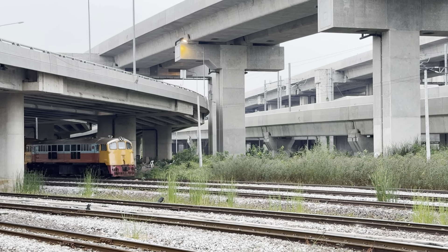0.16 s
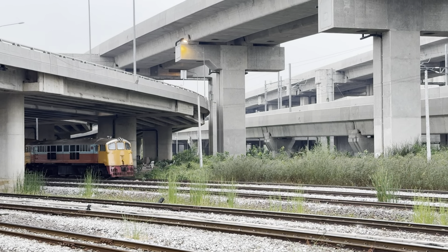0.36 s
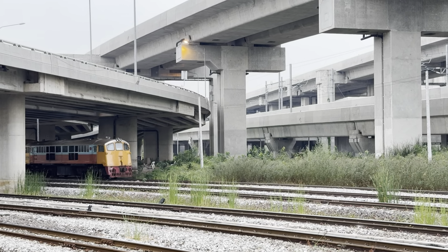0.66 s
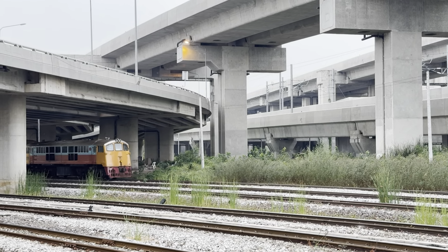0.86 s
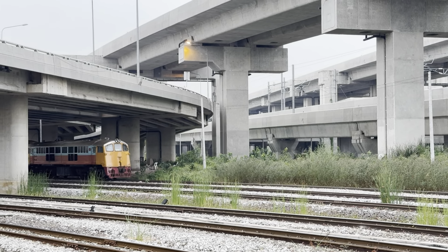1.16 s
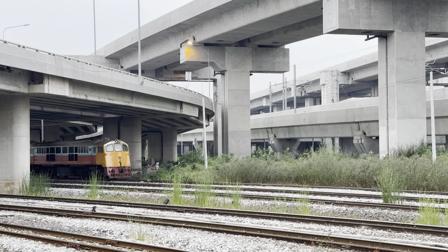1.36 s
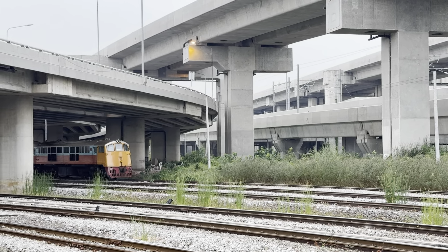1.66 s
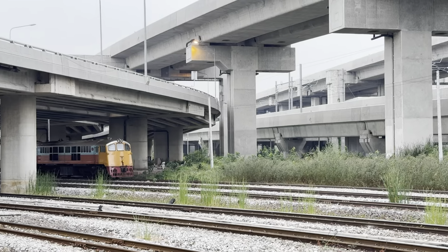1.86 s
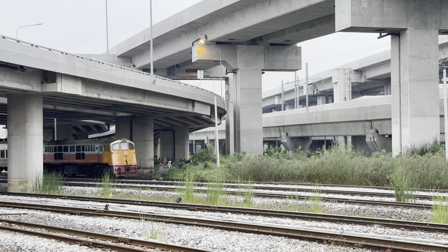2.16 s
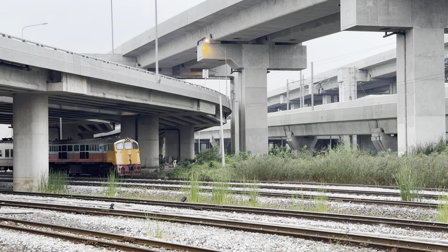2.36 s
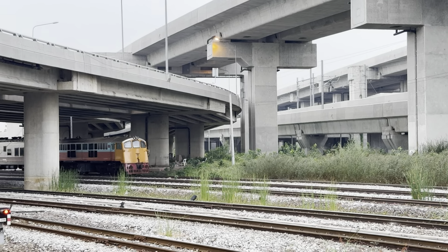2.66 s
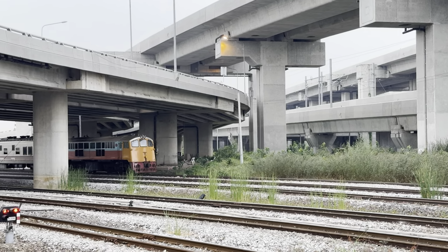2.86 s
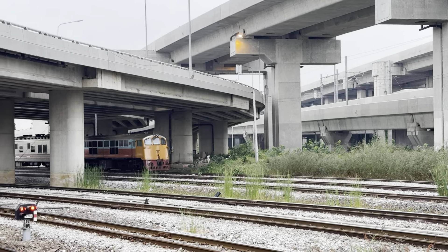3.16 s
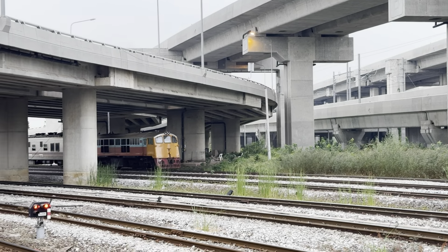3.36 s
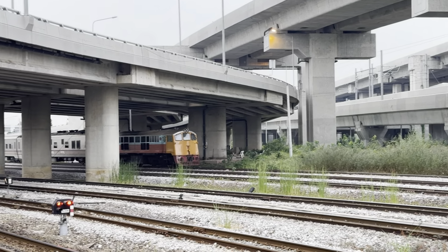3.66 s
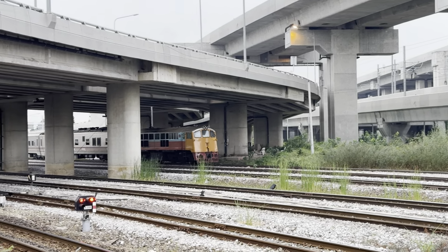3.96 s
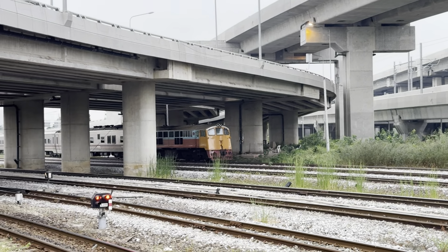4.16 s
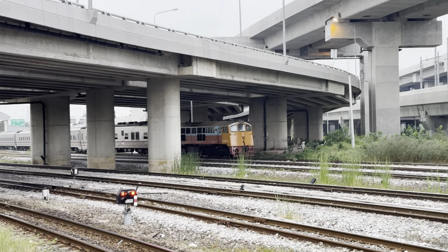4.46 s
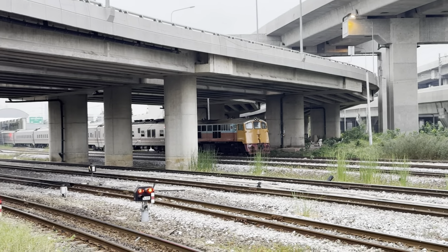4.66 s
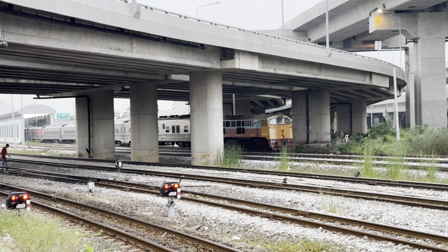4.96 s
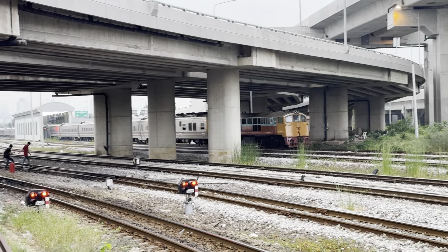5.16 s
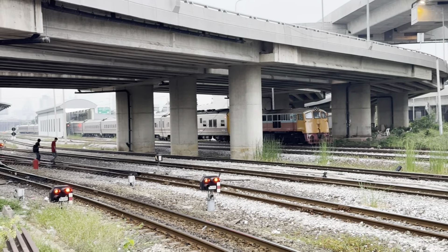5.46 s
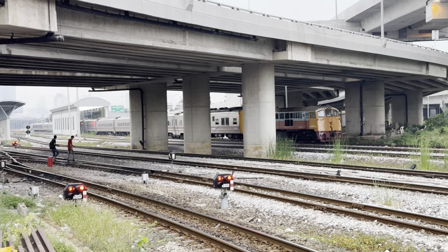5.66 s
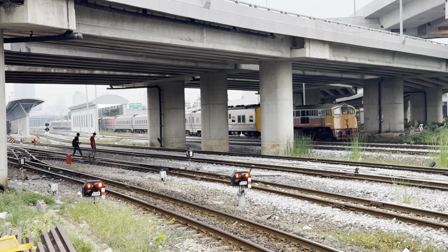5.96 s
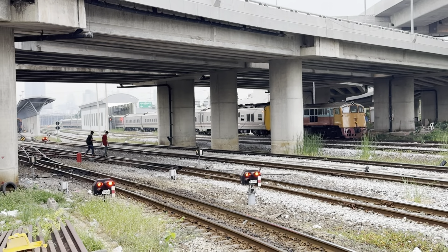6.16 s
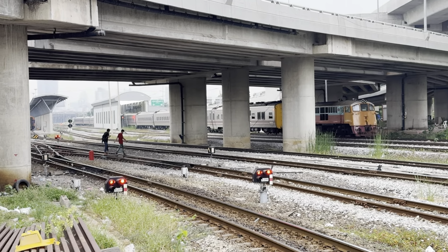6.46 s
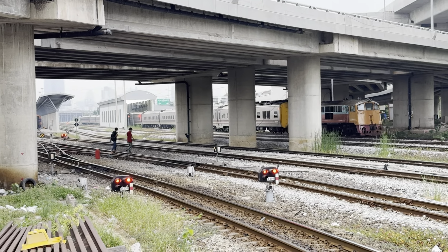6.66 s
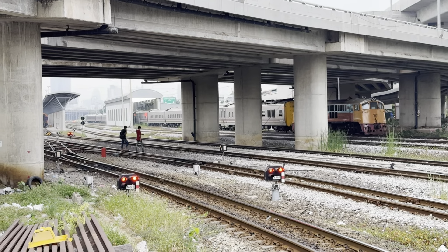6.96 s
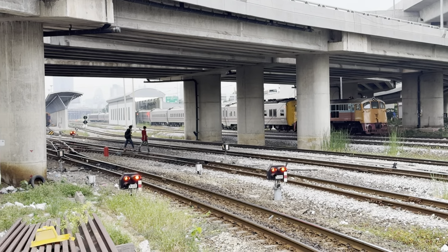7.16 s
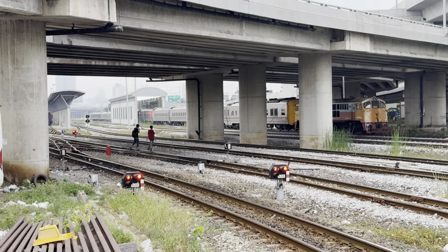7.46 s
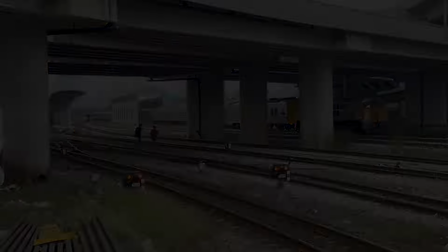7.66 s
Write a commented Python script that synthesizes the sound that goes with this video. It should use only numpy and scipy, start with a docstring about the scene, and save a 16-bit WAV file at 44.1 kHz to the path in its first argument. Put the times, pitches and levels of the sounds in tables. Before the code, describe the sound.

Deep, uneven diesel rumble in a rail yard, with a rasping rush easing down, early high metallic wheel squeals, faint ticks and far bird chirps.

```python
"""A diesel locomotive runs under concrete viaducts in a rail yard, some way off.
Its exhaust throbs as beating tones over a broad machinery roar made of noise bands and resonances.
A rasping whoosh of chopped, narrow noise climbs, then sinks as the load eases.
A wheel squeals in ringing tones for the first three seconds; later a thin whine of narrow noise rises.
A few far birds chirp in short gliding tones, and faint irregular ticks rattle throughout."""
import sys
import numpy as np
from scipy import signal
from scipy.fft import rfft, irfft
from scipy.io import wavfile
from scipy.ndimage import uniform_filter1d

SR = 44100
rng = np.random.default_rng(int(sys.argv[2]) if len(sys.argv) > 2 else 0)


def waveform_to_disk(signal):
    """Save audio, clipped to [-1, 1], as 16-bit WAV at the path in sys.argv[1]."""
    frames = np.transpose(np.atleast_2d(signal))
    scaled = np.clip(frames, -1, 1) * 32767
    samples = np.round(scaled).astype(np.int16)
    wavfile.write(sys.argv[1], SR, samples)


N = 343539


def from_db(db):
    """Turn decibels into gain."""
    return np.exp(np.asarray(db) * (np.log(10) / 20))


def rms_one(x):
    """Scale a sound to an average power of 1."""
    return x / np.sqrt(np.mean(x ** 2) + 1e-20)


def in_time(rows):
    """Draw lines between the rows, giving each column after the first a value at every sample."""
    seconds, *columns = np.transpose(rows)
    return [np.interp(np.arange(N) / SR, seconds, column) for column in columns]


def at_hz(points, hz):
    """Read a spectrum between its points, with pitch on a logarithmic scale."""
    point_hz, value = np.transpose(points)
    return np.interp(np.log(hz), np.log(point_hz), value)


def turn(hz):
    """Add up a frequency over time into a running phase in radians."""
    return 2 * np.pi * np.cumsum(hz * np.ones(N)) / SR


def drift(rate):
    """Wander smoothly at random with spread 1, changing about rate times a second."""
    # Smooth noise is made at a twentieth of the sample rate, then joined by straight lines.
    pole = np.exp(-40 * np.pi * rate / SR)
    white = rng.standard_normal(N // 20 + 4002)
    slow = signal.lfilter([1], [1, -2 * pole, pole * pole], white)
    slow = rms_one(slow[4000:])  # skip the filter's start
    steps = np.diff(slow)[:, None] * (np.arange(20) / 20)
    return (slow[:-1, None] + steps).ravel()[:N]


def narrow_noise(hz, width_hz):
    """Stir a resonance at random: a tone whose strength and phase wander, with rms 1."""
    turns = turn(hz) / (2 * np.pi)
    phase = (2 * np.pi * (turns - np.floor(turns))).astype(np.float32)
    return drift(width_hz * .75) * np.cos(phase) + drift(width_hz * .75) * np.sin(phase)


def spread(mid, side, hz):
    """Let two microphones hear a pitch more or less alike, by adding side with opposite signs."""
    # How far the two ears differ. Each row: pitch in Hz, side level in dB against the middle.
    width_points = [(60, -32), (125, -18.5), (250, -16), (400, -16), (570, -5.5), (720, -10), (900, -10),
                    (1140, -3), (1440, -16), (1810, -72), (2300, -70), (3300, -47), (5500, -50),
                    (7500, -55), (13000, -30)]
    return mid + from_db(at_hz(width_points, hz)) * side * np.array([[1], [-1]])


def banded_noise(spectrum, flicker_db, flicker_rate):
    """Add up third-octave bands of stereo noise, each flickering by itself; the sum has rms 1."""
    out, edges = 0, 20 * 2 ** (np.arange(30) / 3)
    white = rng.standard_normal((2, 2, N))
    for k, (low, high) in enumerate(zip(edges, edges[1:])):
        hz = np.sqrt(low * high)
        if spectrum[0][0] <= hz <= spectrum[-1][0]:
            band = signal.butter(3, [low, high], "band", fs=SR, output="sos")
            mid, side = signal.sosfilt(band, white[k % 2])  # neighbouring bands use separate noise
            level_db = at_hz(spectrum, hz) + flicker_db * drift(flicker_rate)
            out = out + from_db(level_db) * spread(mid, side, hz)
    return rms_one(out)


def smooth_noise(spectrum):
    """Shape random noise into an even, featureless sound of a given colour, with rms 1."""
    hz = np.maximum(np.arange(N // 2 + 1) * SR / N, 1)
    white = rng.standard_normal(N)
    return rms_one(irfft(rfft(white) * from_db(at_hz(spectrum, hz)), N))


def steadied(x, seconds):
    """Even out the slow swells of a sound, keeping its quick beating."""
    power = np.mean(x ** 2, axis=0)
    return x / np.sqrt(uniform_filter1d(power, int(seconds * SR)) + 1e-12)


def resonances(modes):
    """Add up randomly stirred resonances, in stereo."""
    out = 0
    for hz, width_hz, db in modes:
        mid, side = narrow_noise(hz, width_hz), narrow_noise(hz, width_hz)
        out = out + from_db(db) * spread(mid, side, hz)
    return out


def echoed(hz, width_hz, side_db):
    """Blur a tone as echoes from the piers do, slightly differently at each microphone."""
    side = from_db(side_db) * narrow_noise(hz, width_hz)
    return narrow_noise(hz, width_hz) + side * np.array([[1], [-1]])


def under_load(full_db, follows):
    """Give the gain of a part of the machinery as the load eases; follows is its share of the easing."""
    # The machinery quietens. Each row: time in seconds, level in dB against full load.
    load_curve = [(0, 0), (2.2, -0.5), (3.2, -2.5), (5.5, -5), (7.79, -6)]
    return from_db(full_db + follows * in_time(load_curve)[0])


def birds(echo_db=-15, echo_s=.04, blur_db=-6):
    """Sing short gliding chirps, blurred and trailed by echoes off the concrete."""
    # Far birds. Each row: start in seconds, middle pitch in Hz, length in seconds,
    # glide in octaves, level in dB.
    chirps = [(0.185, 5420, .065, -0.023, -50), (4.12, 4970, 0.047, -0.048, -51),
              (5.29, 3900, .047, -0.043, -53), (5.308, 5160, 0.034, -.06, -57),
              (5.5, 6480, .086, -0.004, -62), (5.572, 5010, .04, -.06, -47),
              (6.42, 5170, .043, -0.069, -55), (6.471, 6560, .12, -.01, -60),
              (6.606, 3880, 0.027, -0.12, -44), (6.72, 4700, .04, .22, -54),
              (6.763, 3910, 0.038, -0.108, -45), (6.787, 4380, 0.032, .17, -51),
              (6.93, 3800, .035, -.12, -43), (7.091, 3800, 0.037, -.12, -50), (7.21, 6500, .13, -.01, -58),
              (7.555, 4700, .04, .13, -50)]
    out, age = np.zeros(N + SR), np.arange(SR // 2) / SR
    scatter = drift(170) + 1j * drift(170)
    for start, hz, length, glide, db in chirps:
        at = int(np.clip(start * SR, 0, N - 1)) + np.arange(len(age))
        along = np.clip(age / length, 0, 1)
        gliding_hz = hz * 2 ** (glide * (along - .5))
        tone = np.exp(2j * np.pi * np.cumsum(gliding_hz) / SR)
        note = np.sin(np.pi * along) * (1 + from_db(blur_db) * scatter[at % N])
        fade = np.exp(-np.maximum(age - length, 0) / echo_s)
        echo = along * fade * scatter[at % N]
        out[at] += from_db(db) * np.real(tone * (note + from_db(echo_db) * echo))
    return out[:N]


def whine():
    """Whistle faintly and unsteadily, climbing slowly, as a narrow band of noise."""
    # Thin whine. Each row: time in seconds, pitch in Hz, level in dB.
    whine_curve = [(2.9, 6780, -85), (3.4, 7020, -88), (4.5, 7260, -76), (5.8, 7516, -66), (6.8, 7810, -73),
                   (7.79, 7850, -65)]
    hz, db = in_time(whine_curve)
    return from_db(db) * narrow_noise(hz, width_hz=38)


def singing_mode(mode, hz, murmur_db, echo_db, width_hz):
    """Murmur unevenly under the contact; at each catch lock into a tone that rises, holds and rings out."""
    # The wheel catches and one mode sings out. Each row: start in seconds, length in seconds,
    # name of the mode, level in dB.
    catch_rows = [(0.563, 0.019, "low", -33.5), (0.666, 0.017, "low", -33.5), (0.81, 0.058, "low", -37),
                  (1.0, 0.032, "low", -46), (1.18, 0.045, "middle", -50), (1.42, .06, "low", -40),
                  (1.604, 0.26, "low", -39), (1.87, 0.094, "low", -30), (1.98, 0.28, "high", -55.5),
                  (2.004, 0.15, "low", -35.5), (2.133, 0.13, "low", -37.5), (2.14, 0.067, "middle", -51),
                  (2.23, 0.068, "high", -45), (2.256, 0.27, "middle", -49.5), (2.33, 0.12, "low", -39),
                  (2.37, 0.3, "high", -45.5), (2.483, 0.25, "low", -37), (2.55, 0.28, "middle", -51.5)]
    # How hard the wheel bears on the rail. Each row: time in seconds, level in dB against full contact.
    contact_curve = [(0, -9.5), (.45, 0.5), (2.8, -1), (3.05, -10), (3.45, -19), (3.8, -49), (4.2, -80)]
    attack_s, t60_s = .02, .16  # t60: time to fade by 60 dB
    side_db = -21
    flutter_db, flutters_per_s = 1.8, 34
    t, catches = np.arange(N) / SR, 0
    for start, length, which, db in catch_rows:
        if which == mode:
            rising = np.clip((t - start) / attack_s, 0, 1)
            dying_db = -60 * np.clip((t - start - length) / t60_s, 0, 3)
            catches = np.maximum(catches, rising * from_db(db + dying_db))
    blurred = echoed(hz, width_hz, side_db)
    pure = np.sqrt(2) * np.cos(turn(hz))
    tone = steadied(pure + from_db(echo_db) * blurred, seconds=0.04)
    murmur_gain = from_db(murmur_db + in_time(contact_curve)[0])
    murmur = murmur_gain * steadied(blurred, seconds=0.16)
    flutter = from_db(flutter_db * drift(flutters_per_s))
    return flutter * (catches * tone + murmur)


def wheel():
    """Let three modes of the wheel sing out while the rubbing flange stirs the others roughly."""
    # Pitches of the singing modes. Each row: time in seconds, low, middle and high pitch in Hz.
    squeal_pitches = [(0, 4702, 6645, 8560), (.9, 4699, 6650, 8560), (1.6, 4705, 6655, 8552),
                      (2.15, 4708, 6694, 8549), (3.4, 4710, 6702, 8549)]
    # Wheel modes stirred by the rubbing. Each row: pitch in Hz, width in Hz, level in dB before the rub.
    rubbed_modes = [(3950, 80, -4), (4033, 32, -1.5), (4463, 25, -7), (4915, 25, -8), (7175, 30, -13),
                    (7950, 160, -11), (8110, 80, -7), (9410, 60, -15), (12180, 60, -23)]
    # Flange rubbing on the rail. Each row: time in seconds, level in dB.
    rub_curve = [(0, -73), (1, -81), (1.12, -52.5), (1.6, -50), (1.85, -46.5), (2.15, -47.5), (2.55, -49),
                 (2.8, -60), (3.3, -87), (4, -93)]
    # A wheel mode that flares briefly. Each row: time in seconds, level in dB.
    flare_curve = [(1.0, -80), (1.68, -70), (1.78, -47), (1.93, -51), (2.1, -63), (2.4, -55), (2.7, -73),
                   (3.3, -100)]
    flare_hz = 5865
    low, middle, high = in_time(squeal_pitches)
    song = singing_mode("low", low, murmur_db=-45.0, echo_db=-26, width_hz=15.2)
    song += singing_mode("middle", middle, murmur_db=-58.5, echo_db=-17, width_hz=23)
    song += singing_mode("high", high, murmur_db=-61.5, echo_db=-28, width_hz=17)
    rough = 0
    for hz, width_hz, db in rubbed_modes:
        rough = rough + from_db(db + 1.8 * drift(9.1)) * narrow_noise(hz, width_hz)
    flare = from_db(in_time(flare_curve)[0]) * narrow_noise(flare_hz, width_hz=39)
    return song + from_db(in_time(rub_curve)[0]) * rough + flare


def rattle(per_s=90, spread_db=5.0, level_db=-59):
    """Tick faintly and irregularly: each tap strikes small loose parts, with its own strength for each mode."""
    # Modes of small loose parts. Each row: pitch in Hz, time to fade by 60 dB in seconds,
    # level in dB against the other modes.
    loose_parts = [(2700, .012, -26), (3700, 0.011, 11), (4290, 0.019, 3), (4980, 0.011, -3),
                   (6540, 0.0034, -18), (8200, 0.0067, -11), (12400, 0.0079, -9)]
    strength_db = spread_db * np.minimum(rng.exponential(1, N), 3)
    taps = (rng.random(N) < per_s / SR) * from_db(strength_db)
    out = 0
    for hz, t60, db in loose_parts:
        pole, w = from_db(-60 / (t60 * SR)), 2 * np.pi * hz / SR
        strikes = taps * rng.standard_normal(N) + 1e-18  # the tiny offset avoids vanishing numbers
        ring = signal.lfilter([0, np.sin(w)], [1, -2 * pole * np.cos(w), pole * pole], strikes)
        out = out + from_db(db) * ring
    return from_db(level_db) * rms_one(out)


def knocking(rough_db=2.0):
    """Puff strongly, then more weakly, in each turn; returns a gain of about unit power."""
    # How deeply the knocking chops the rush. Each row: time in seconds, depth from 0 to 1.
    knock_depth = [(0, 0.74), (1, 0.56), (1.7, 0.5), (2.4, 0.15), (7.79, 0)]
    knocks_per_s = 31.1
    second_puff, sharpness = .48, 2.4
    swing = sharpness * np.cos(turn(knocks_per_s) + drift(25) / 10)
    pair = np.exp(swing) + second_puff * np.exp(-swing)  # the second comes half a turn later
    puffs = rms_one(pair * from_db(rough_db * drift(21)))
    depth = np.clip(in_time(knock_depth)[0], 0, 1)
    return np.sqrt(1 - depth + depth * puffs ** 2)


def turbo(knock):
    """Rush air in a band that follows the load and stirs its casing, chopped by the knocking."""
    # Air rushing through the turbocharger. Each row: time in seconds, centre pitch in Hz, level in dB.
    whoosh_curve = [(0, 1707, -42), (.5, 1876, -40), (1.45, 1916, -38.5), (2.1, 2000, -36),
                    (2.55, 2067, -40), (3, 1966, -48.5), (3.8, 1805, -50), (4.8, 1717, -52.5),
                    (5.7, 1566, -48), (6.6, 1466, -48), (7.79, 1403, -49)]
    # Ring of the turbocharger casing. Each row: pitch in Hz, width in Hz, level in dB against the rush.
    casing_modes = [(2995, 93, -24)]
    hz, db = in_time(whoosh_curve)
    rush = steadied(narrow_noise(hz, width_hz=180)[None], seconds=0.056)
    return from_db(db) * (rush + resonances(casing_modes)) * knock


def clatter(knock):
    """Mix mechanical noise, lightly shaken by the knocking, with a fine hiss and bright resonances."""
    # Colour of the mechanical noise. Each row: pitch in Hz, relative level in dB per Hz.
    clatter_colour = [(300, 4), (560, -1.5), (720, 3), (900, 2), (1140, 0), (1440, -1.5), (1810, -5.5),
                      (2280, -7.5), (2870, -6.5), (3620, -32.5), (4560, -14), (5750, -19.5), (7240, -22),
                      (9120, -25), (10000, -40)]
    # Colour of the hiss. Each row: pitch in Hz, relative level in dB per Hz.
    hiss_colour = [(2000, -34), (3000, -15), (4560, 10.5), (5750, 0.5), (7240, -1.5), (8400, -6.5),
                   (9400, 4.5), (10500, 6), (11500, -1), (12400, -7.5), (13500, -5), (15000, -30)]
    # Airy hiss. Each row: time in seconds, level in dB.
    air_curve = [(0, -52), (1.1, -50), (2.5, -53), (3.5, -55), (4.3, -55.5), (5, -57), (6, -61),
                 (7.79, -59)]
    # Bright resonances of the machinery. Each row: pitch in Hz, width in Hz, level in dB.
    sizzle_modes = [(2519, 830, -51), (2890, 47, -59.5), (3614, 380, -50.5), (4470, 360, -68)]
    noise = banded_noise(clatter_colour, flicker_db=1.52, flicker_rate=23)
    shaken = under_load(full_db=-34.5, follows=1) * noise * knock ** 0.28
    hiss_db = in_time(air_curve)[0] + .5 * drift(30)
    hiss = from_db(hiss_db) * smooth_noise(hiss_colour)
    return shaken + hiss + resonances(sizzle_modes)


def roar():
    """Sound the engine casing as noise with hollow resonances, and one wavering tone above them."""
    # Colour of the casing noise. Each row: pitch in Hz, relative level in dB per Hz.
    body_colour = [(70, -33), (90, -3), (113, 4.5), (143, -0.5), (180, 2), (226, 0.5), (285, -2.5),
                   (359, -4), (452, -4.5), (570, -13.5), (900, -30.5)]
    # Resonances of hood and underpass. Each row: pitch in Hz, width in Hz, relative level in dB.
    hollow_modes = [(352.4, 70, -5.5), (394.7, 38, -4.5), (439.6, 10, -7.5), (454.3, 32, -11.5),
                    (484, 28, -11.5)]
    # Wavering machine tone. Each row: time in seconds, pitch in Hz, level in dB.
    tone_curve = [(0, 813, -48), (2.2, 819, -49.5), (2.8, 770, -46.5), (3.7, 805, -48), (4.7, 800, -50),
                  (6.2, 804.5, -49.5), (7.79, 802, -52)]
    casing = steadied(banded_noise(body_colour, flicker_db=1.83, flicker_rate=13.5), seconds=0.13)
    body = under_load(full_db=-31.5, follows=0.29) * casing
    ringing = steadied(resonances(hollow_modes), seconds=0.34)
    hollow = under_load(full_db=-32.5, follows=1.45) * ringing
    tone_hz, tone_db = in_time(tone_curve)
    tone = from_db(tone_db) * echoed(tone_hz, width_hz=18.6, side_db=-0.5)
    return body + hollow + tone


def exhaust():
    """Unequal cylinders give lines at multiples of the cycle rate, which beat over a rough rumble."""
    # Engine speed. Each row: time in seconds, pitch of the strongest exhaust tone in Hz.
    speed_curve = [(0, 92.6), (2.4, 91.16), (3.3, 92.93), (3.9, 89.47), (4.6, 91.03), (5.3, 91.83),
                   (6.3, 91.25), (7.79, 93.07)]
    # Exhaust lines. Each row: multiple of the engine cycle rate, relative level in dB.
    order_levels = [(5, -26), (6, -49), (9, -27), (10, -11.5), (11, -11), (12, -3.5), (13, -4), (14, -10.5),
                    (19, -27.5), (21, -18)]
    # Colour of the rumble. Each row: pitch in Hz, relative level in dB per Hz.
    rumble_colour = [(22, -52), (28, -39), (36, -16), (45, -8), (57, -6), (71, 1.5), (90, -10.5),
                     (113, -26.5), (150, -32)]
    # Deep exhaust throb. Each row: time in seconds, level in dB.
    throb_curve = [(0, -22), (1.2, -27), (1.75, -29.5), (2.1, -26.5), (3.2, -26.5), (4.5, -28), (5.25, -24),
                   (5.6, -29.5), (7.7, -26.5)]
    # Strongest exhaust tone. Each row: time in seconds, level in dB.
    drone_curve = [(0, -25.5), (.7, -30.5), (1.1, -23.5), (1.35, -35), (1.87, -25), (2.0, -33.5),
                   (2.7, -21), (3.05, -27.5), (3.47, -18.5), (3.62, -29), (3.78, -20), (4.6, -23),
                   (5.3, -24.5), (6.33, -21.5), (6.55, -35), (6.75, -20), (7.25, -32.5), (7.58, -23.5),
                   (7.79, -29)]
    # Hum of an upper engine order. Each row: time in seconds, level in dB.
    hum_curve = [(0, -41.5), (1, -38), (2.4, -52), (3.2, -54), (3.8, -43), (4.5, -47), (5.1, -38),
                 (5.7, -36), (6.2, -44.5), (7.79, -47)]
    main_order, hum_order = 15, 25  # multiples of the engine cycle rate
    surge_db, surges_per_cycle = 1, 2  # the throb leans on two moments of each cycle
    waver_db, wavers_per_s = 2.2, 4.8
    uneven_db, uneven_per_s, uneven_spread_per_s = 1.3, 8.5, 6  # lumps: depth, usual rate, its spread

    cycle = turn(in_time(speed_curve)[0]) / main_order
    lines = 0
    for order, db in order_levels:
        phase = order * cycle + rng.uniform(0, 2 * np.pi) + .5 * drift(0.83)
        lines = lines + from_db(db + 2.0 * drift(0.53)) * np.sin(phase)
    rumble = from_db(-2.0) * banded_noise(rumble_colour, flicker_db=0.0, flicker_rate=4)
    throb_db = in_time(throb_curve)[0] + surge_db * np.cos(surges_per_cycle * cycle)
    throb = from_db(throb_db) * steadied(lines + rumble, seconds=0.12)
    drone_db = in_time(drone_curve)[0] + waver_db * drift(wavers_per_s)
    drone = from_db(drone_db) * np.sin(main_order * cycle + 0.34 * drift(3.1))
    hum_tone = np.sqrt(2) * np.sin(hum_order * cycle + 0.3 * drift(0.89))
    hum = from_db(in_time(hum_curve)[0]) * hum_tone
    # Throb and drone come in uneven lumps together; the hum stays clear of them.
    lumps = from_db(uneven_db * narrow_noise(uneven_per_s, uneven_spread_per_s))
    return lumps * (throb + drone) + hum


def scene():
    """Add everything together; the exhaust and roar lean a little to the right."""
    knock = knocking()
    lean = from_db(np.array([[-.24], [.24]]))  # left, right
    engine = (exhaust() + roar()) * lean
    return engine + clatter(knock) + rattle() + turbo(knock) + wheel() + whine() + birds()


def record(dry):
    """Shift the microphones apart in phase up high, drop the sound for an instant near the end, cut the top."""
    # The microphones fall out of step in the top treble. Each row: pitch in Hz, phase difference in radians.
    phase_points = [(0, 0), (8150, 0), (8550, 1.3), (9000, 3.0), (9700, 3.25), (10000, 3.75), (10800, 4.7),
                    (11600, 6.2), (12700, 6.4), (13300, 7.8)]
    # The instant without sound: its start and end in seconds.
    silence = (7.729, 7.774)
    cutoff_hz = 13500
    hz = np.arange(N // 2 + 1) * SR / N
    phase = np.interp(hz, *np.transpose(phase_points))
    pair = irfft(rfft(dry) * np.exp(1j * phase * np.array([[.5], [-.5]])), N)
    t = np.arange(N) / SR
    sounding = 1.0 * ((t < silence[0]) | (t > silence[1]))
    live = uniform_filter1d(sounding, size=120)  # soften the edges
    low_pass = signal.ellip(10, .1, 90, cutoff_hz, fs=SR, output="sos")
    return signal.sosfilt(low_pass, pair * live)


dry = scene()
out = record(dry)
waveform_to_disk(out)
```